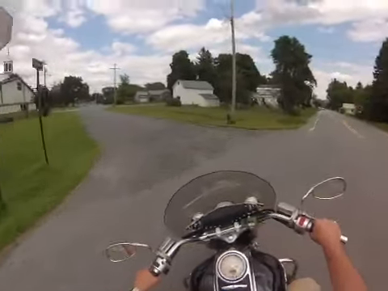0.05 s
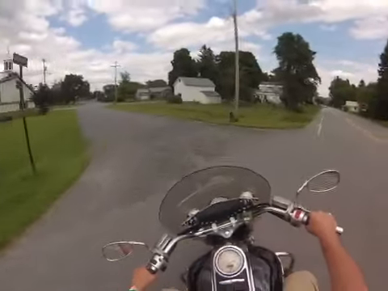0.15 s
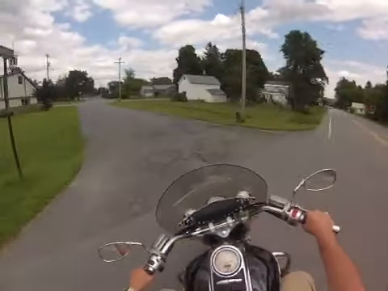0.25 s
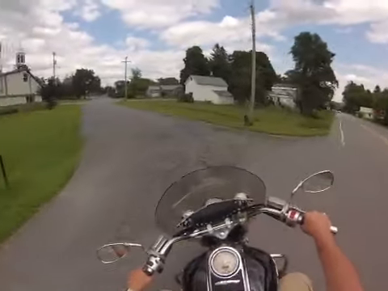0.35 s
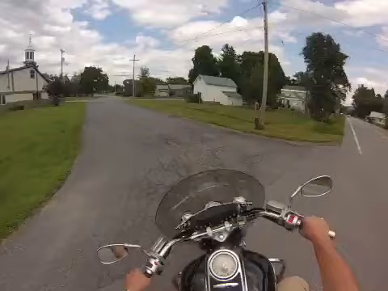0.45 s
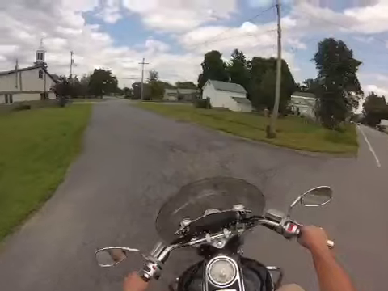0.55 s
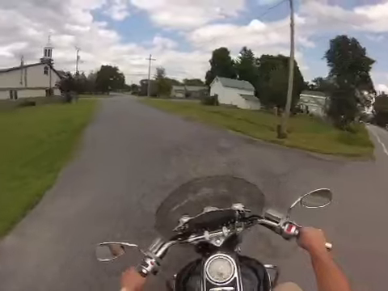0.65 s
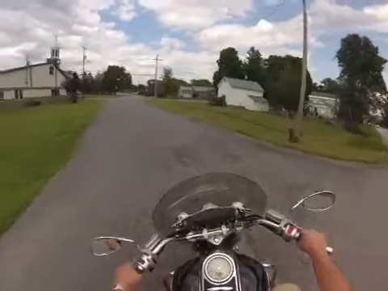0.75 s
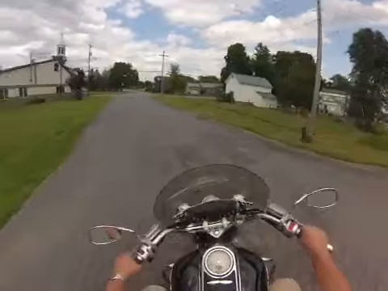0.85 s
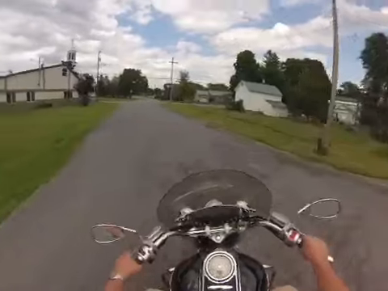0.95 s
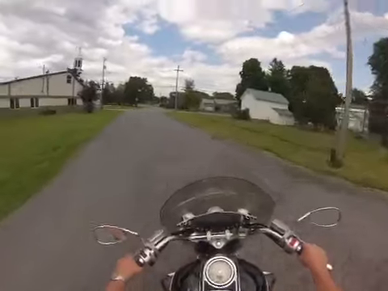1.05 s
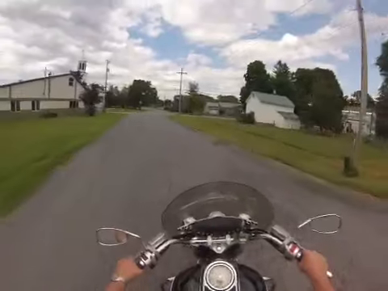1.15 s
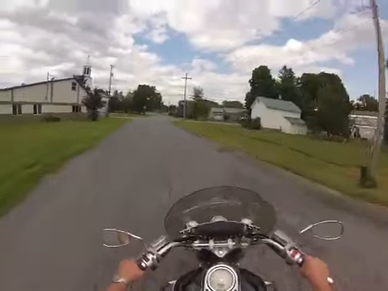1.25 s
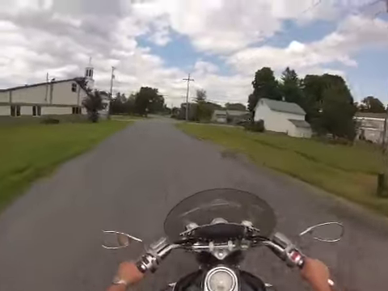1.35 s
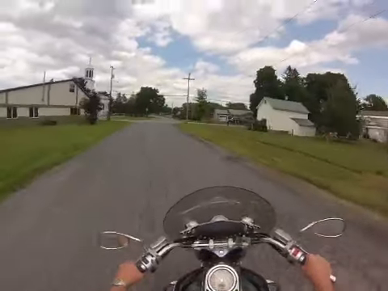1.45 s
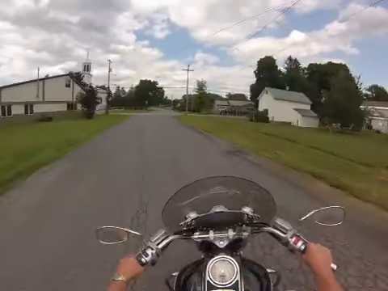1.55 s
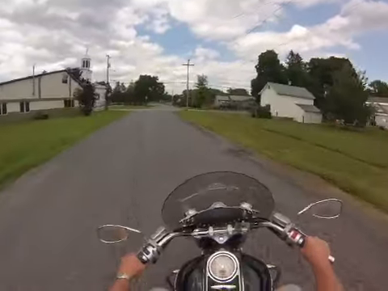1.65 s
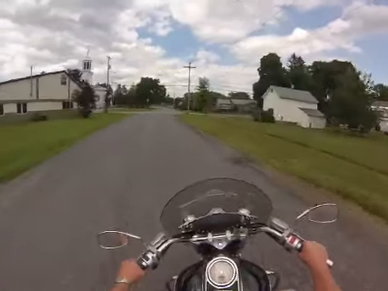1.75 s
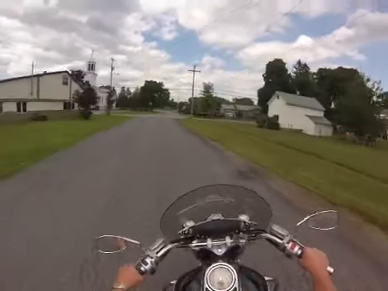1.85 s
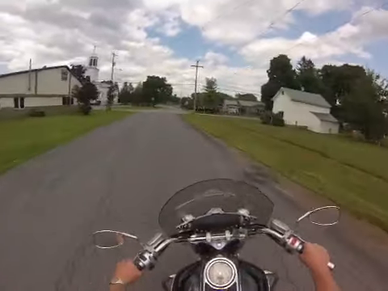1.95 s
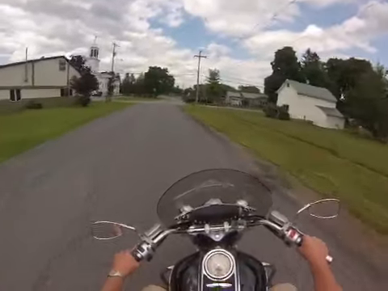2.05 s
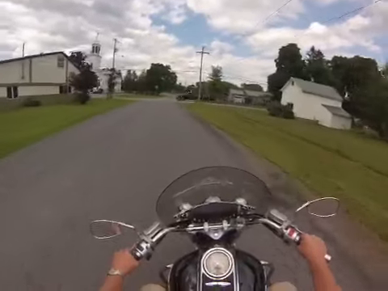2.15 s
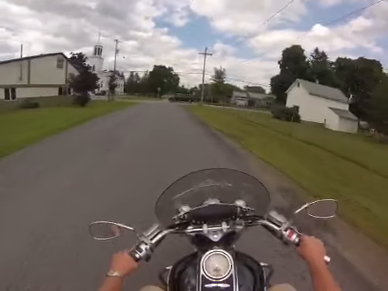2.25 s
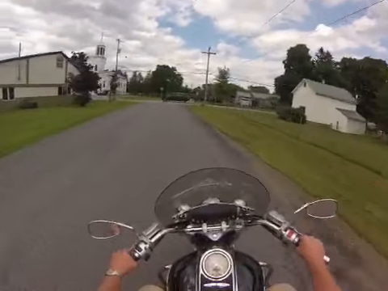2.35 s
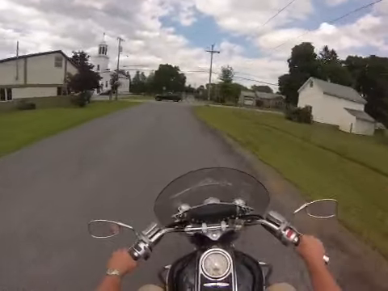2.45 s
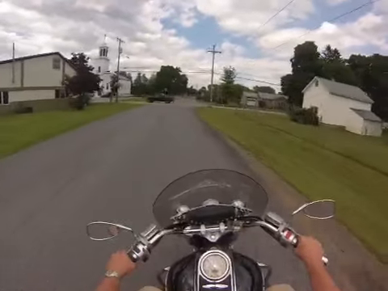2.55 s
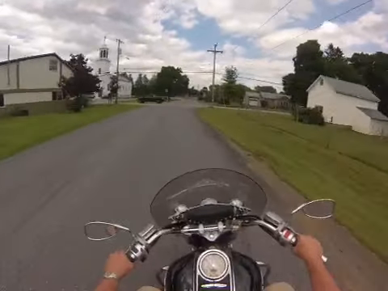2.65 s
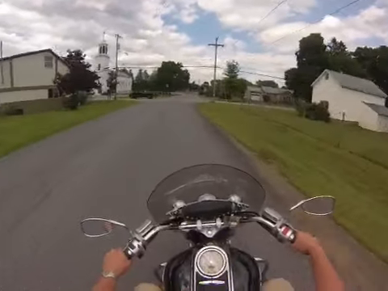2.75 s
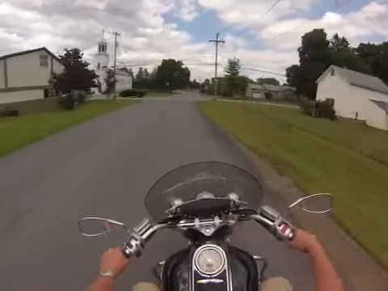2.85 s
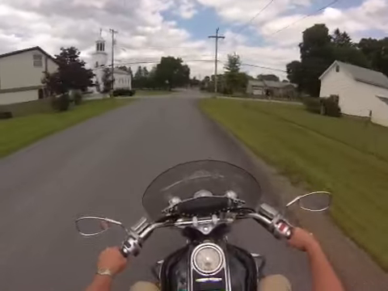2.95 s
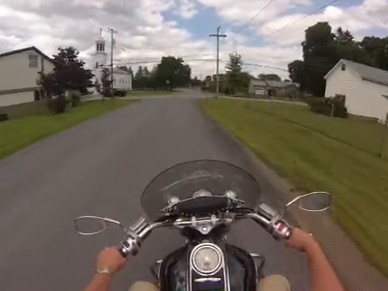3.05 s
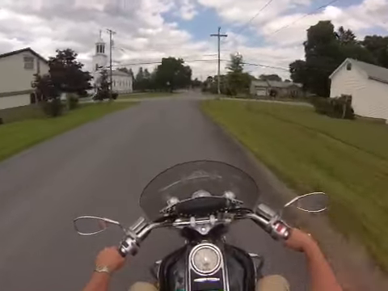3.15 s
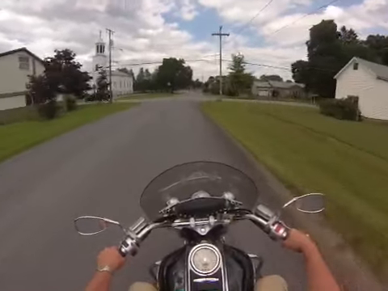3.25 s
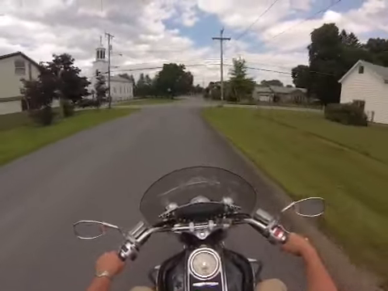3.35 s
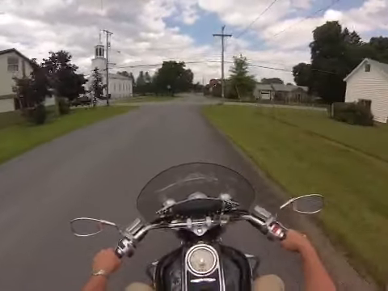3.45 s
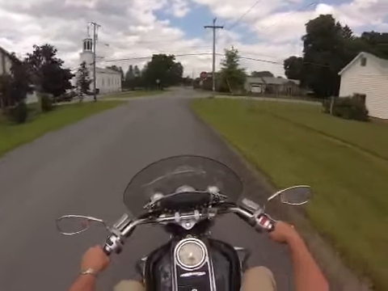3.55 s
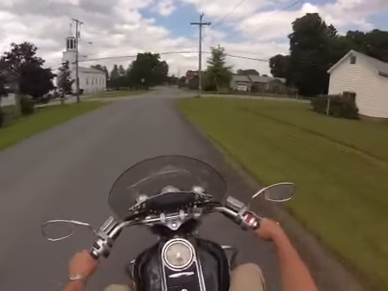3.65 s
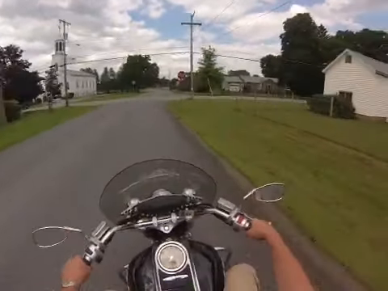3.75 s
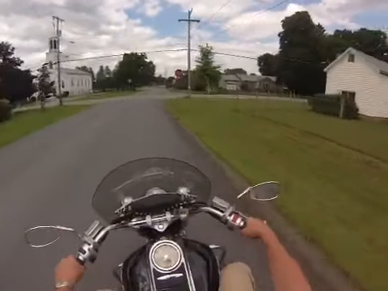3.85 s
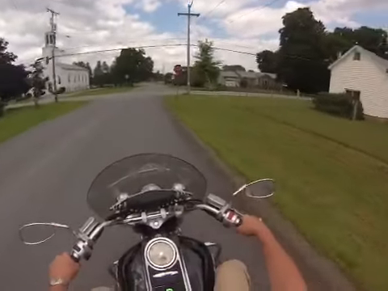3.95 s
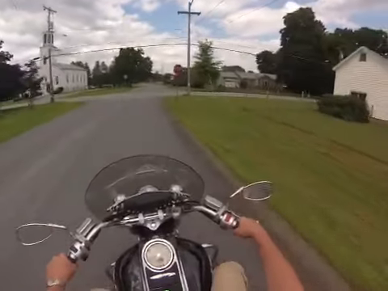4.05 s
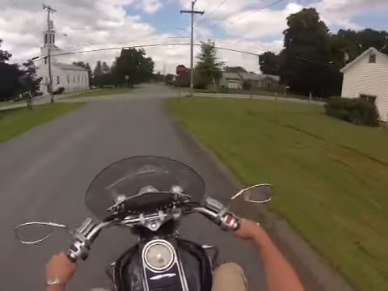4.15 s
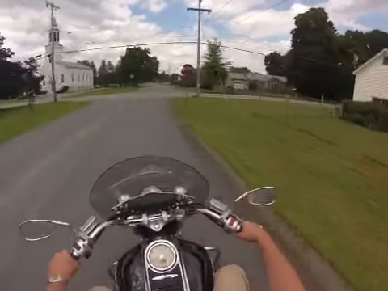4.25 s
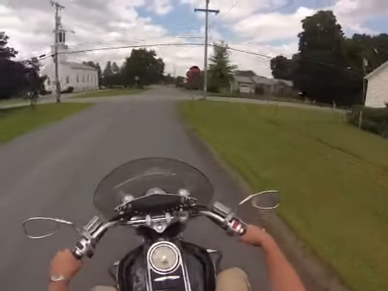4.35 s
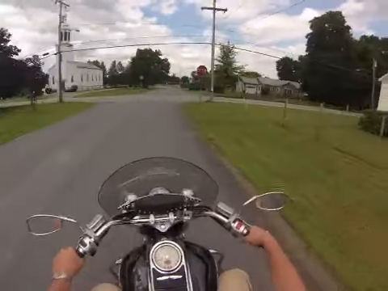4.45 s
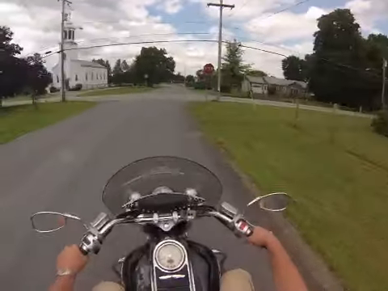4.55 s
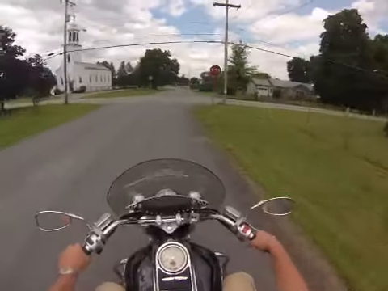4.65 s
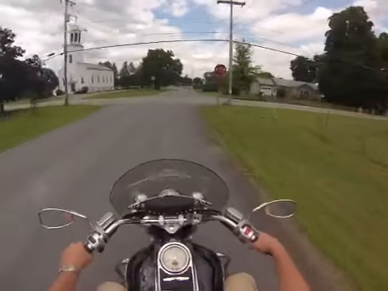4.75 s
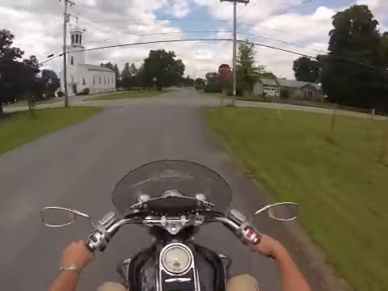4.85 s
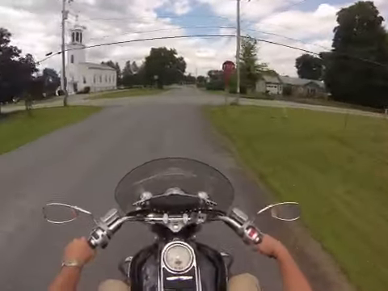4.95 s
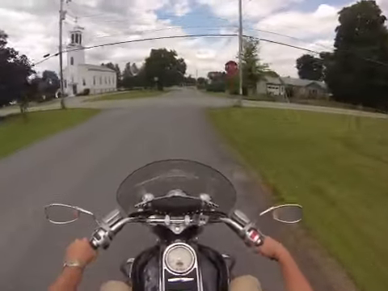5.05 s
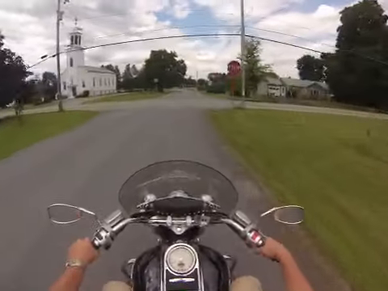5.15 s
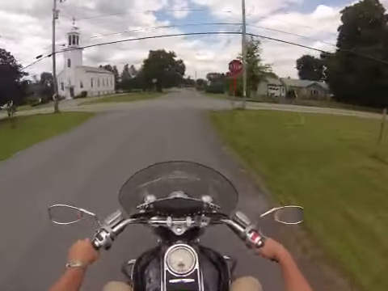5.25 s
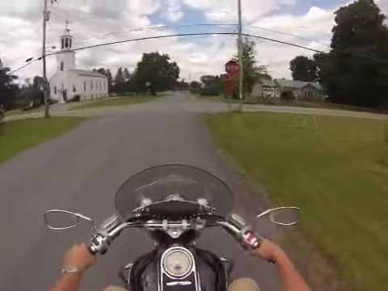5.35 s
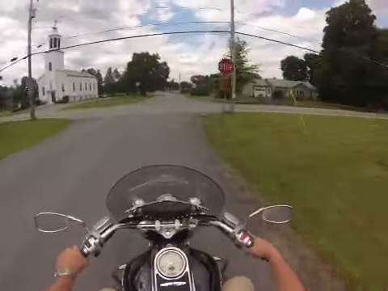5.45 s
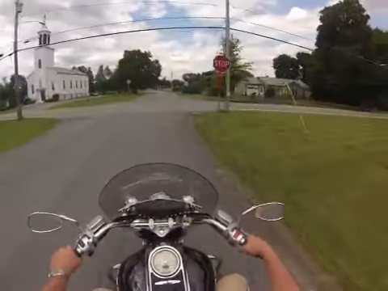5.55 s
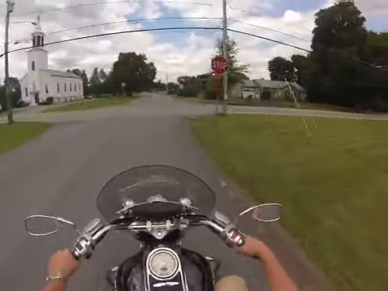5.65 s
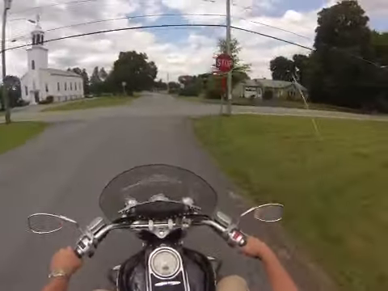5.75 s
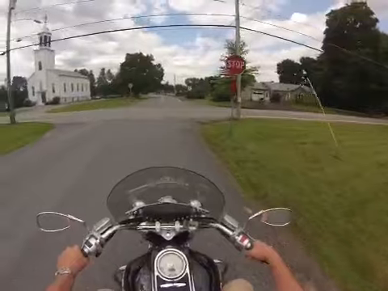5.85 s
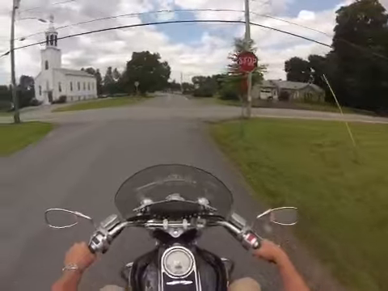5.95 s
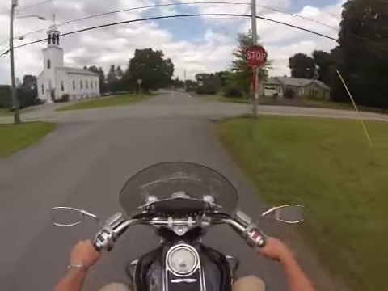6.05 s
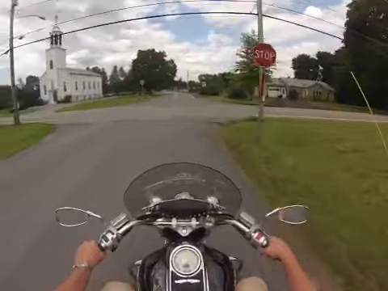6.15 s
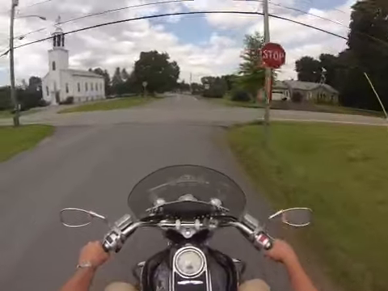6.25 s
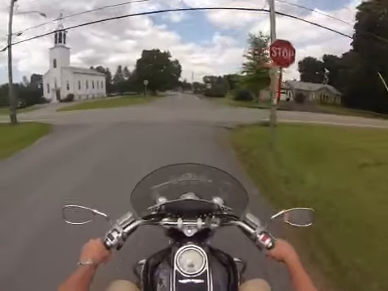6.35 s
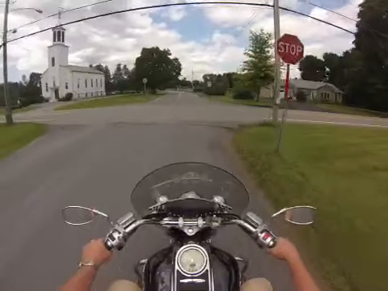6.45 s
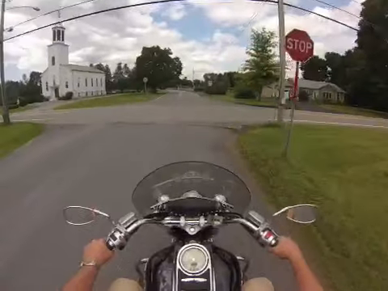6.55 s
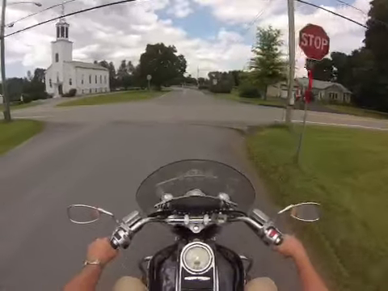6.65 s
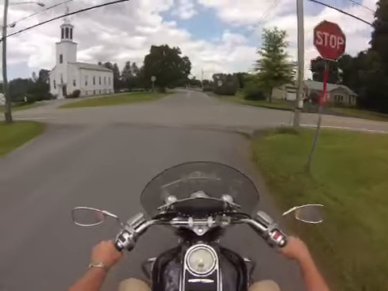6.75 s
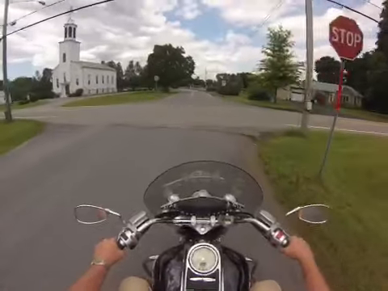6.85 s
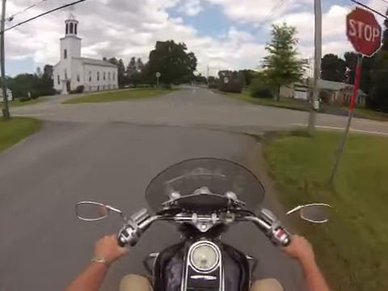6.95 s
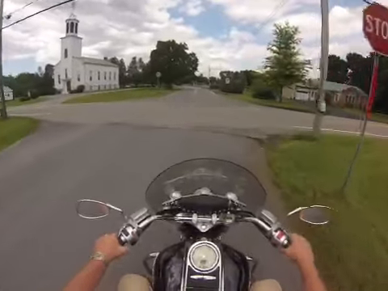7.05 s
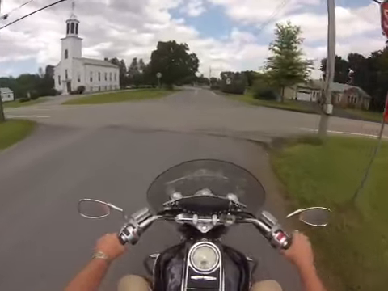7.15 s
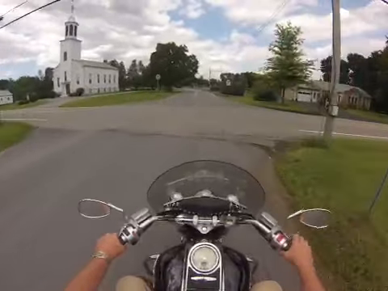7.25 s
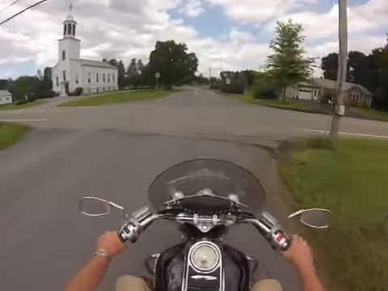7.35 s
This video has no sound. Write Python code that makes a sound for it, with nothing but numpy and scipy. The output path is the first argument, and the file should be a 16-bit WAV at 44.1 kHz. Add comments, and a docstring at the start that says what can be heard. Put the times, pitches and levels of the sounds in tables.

```python
"""Open road with trees at the side, heard from a V-twin cruiser through its rider's camera microphone.
The engine pulls harder up to 2.7 s, the throttle drops near 2.8 s and the beats slow towards idle.
Uneven pairs of exhaust beats drive two resonant pipes and a noisy bark; taps shake a ringing engine case.
Coloured noise makes the gear whirr, intake, rush, buffeting and hiss.
The linkage clacks in noise bursts and decaying sines; a far bird chirps in gliding sines with an echo."""
import sys
import numpy as np
from scipy import signal
from scipy.fft import rfft, irfft, next_fast_len
from scipy.io import wavfile
from scipy.ndimage import uniform_filter1d, map_coordinates

SR = 44100
rng = np.random.default_rng(int(sys.argv[2]) if len(sys.argv) > 2 else 0)


def pcm_store(signal):
    """Save signal as 16-bit PCM."""
    levels = np.round(np.clip(np.atleast_2d(signal), -1, 1) * 32767)
    wavfile.write(sys.argv[1], SR, levels.astype(np.int16).T)


N = 326781
TIME = np.arange(N) / SR


def amp(db):
    """Decibels to gain."""
    return 10 ** (np.asarray(db) / 20)


def unit(x):
    """Scale to rms 1."""
    return x / np.sqrt(np.mean(x ** 2) + 1e-20)


def curves(rows):
    """One value per sample for each column after the time."""
    times, *columns = np.transpose(rows)
    return [np.interp(TIME, times, column) for column in columns]


def wobble(rate):
    """A smooth random curve through normal knots, rate knots a second."""
    knots = rng.standard_normal(int(N * rate / SR) + 4)
    return map_coordinates(knots, [TIME * rate])


def colour(x, points):
    """Pass x through a causal, minimum-phase body with the given (frequency [Hz], gain [dB])."""
    m = 2 * next_fast_len(N // 2 + SR // 2)
    hz, db = np.transpose(points)
    bins = np.fft.rfftfreq(m, 1 / SR)
    gain = amp(np.interp(np.log(bins + 1), np.log(hz + 1), db))
    # folding the cepstrum forward in time makes the response causal
    cepstrum = irfft(np.log(gain))
    cepstrum[1:m // 2] *= 2
    cepstrum[m // 2 + 1:] = 0
    return irfft(rfft(x, m) * np.exp(rfft(cepstrum)))[:N]


def noise(points):
    """Coloured noise of rms 1."""
    return unit(colour(rng.standard_normal(N), points))


def patchy(x, depth_db):
    """Let the colour of a noise drift in patches of time and frequency."""
    z = signal.stft(x, nperseg=1024)[2]
    field = uniform_filter1d(rng.standard_normal(z.shape), size=5, axis=0)
    field = uniform_filter1d(field, size=14, axis=1)
    return signal.istft(z * amp(depth_db * unit(field)), nperseg=1024)[1][:N]


def impulses(times, sizes):
    """A train of sharp pushes, each one sample long."""
    return np.bincount(np.clip(times * SR, 0, N).astype(int), sizes, N + 1)[:N]


def dying(train, t60):
    """Give every push an exponential tail that falls 60 dB in t60 seconds."""
    return signal.lfilter([1], [1, -amp(-60 / (t60 * SR))], train)


# Engine speed: (time [s], four-stroke cycles per second [Hz])
ENGINE_SPEED = [(0, 9.178), (.35, 9.117), (.55, 9.147), (.8, 9.697), (1.1, 9.743), (1.7, 10.335),
                (2.3, 10.978), (2.62, 11.429), (3.05, 7.87), (3.5, 6.9), (4.35, 7.48), (4.7, 7.4),
                (5, 7.307), (5.4, 7.22), (5.8, 7.015), (6.2, 7.162), (6.6, 6.99), (7, 7.019), (7.41, 7.2)]


def engine_speed():
    """Four-stroke cycles per second; each cylinder fires once in a cycle."""
    return curves(ENGINE_SPEED)[0]


def passes(cycle, angle):
    """Times at which the engine passes a given share of its cycle."""
    return np.interp(np.arange(int(cycle[-1] - angle) + 1) + angle, cycle, TIME)


# The engine stumbles more around the throttle's drop: (time [s], scatter of firing strength [dB])
STUMBLE = [(0, .5), (2.4, .9), (3, 1.6), (4.5, 1.4), (4.8, .6), (7.41, .8)]
JITTER_HOT_S, JITTER_COOL_S = .0003, .0008  # scatter of the firing times
# after the throttle drops the cylinders starve and fire weakly
OVERRUN_S, OVERRUN_WIDTH_S, OVERRUN_DB = 3.2, .45, -3


def firings(cycle, angle, heat):
    """One cylinder's beats, steady while the gas is hot and looser as it cools."""
    times = passes(cycle, angle)
    strength, lateness = rng.standard_normal((2, len(times)))
    jitter = JITTER_COOL_S + (JITTER_HOT_S - JITTER_COOL_S) * np.interp(times, TIME, heat)
    starved_db = OVERRUN_DB * np.exp(-((times - OVERRUN_S) / OVERRUN_WIDTH_S) ** 4)
    scatter_db = np.interp(times, *np.transpose(STUMBLE))
    return impulses(times + jitter * lateness, amp(starved_db + strength * scatter_db))


# Pipes full of hot gas: (frequency [Hz], front pipe gain [dB], rear pipe gain [dB])
HOT_PIPES = [(12.1, -9.5, -11.5), (25.3, 3, 5), (34, 3.5, 1.5), (42, 3.5, -0.5), (47.8, 8, 7.5), (60, 8, 7),
             (69, 5.5, 7), (79.6, 7.5, 9), (93.6, 9, 12.5), (105, -18, -8), (116, -20, -26),
             (135, -26.5, -17.5), (162, -18, -19.5), (217, -21.5, -19.5), (300, -32.5, -35.5),
             (496, -63, -63), (1010, -91, -88)]
# The same pipes cooled: (frequency [Hz], front pipe gain [dB], rear pipe gain [dB])
COOL_PIPES = [(11.8, -6, -19), (25, -5, -20), (34.5, 7, 7.5), (42, 5, 7), (51, 11.5, 3), (59, 10, 0.5),
              (71, 2, 2.5), (84.8, 10.5, 7.5), (93.3, 1, 2.5), (101.5, -16, -4), (114, -14, -18),
              (135, -21, -22), (165, -26, -26), (220, -29, -28), (300, -29, -26), (503, -59, -62),
              (1000, -90, -91)]


def pipe(beats, heat, column):
    """One cylinder's pipe (column 1 front, 2 rear), whose resonances shift as the gas cools."""
    hot = [(row[0], row[column]) for row in HOT_PIPES]
    cool = [(row[0], row[column]) for row in COOL_PIPES]
    return colour(beats * heat, hot) + colour(beats * (1 - heat), cool)


# Load on the engine: (time [s], throttle opening [0-1])
THROTTLE = [(0, 0.83), (.8, 0.87), (2, 1), (2.76, 0.9), (2.85, 0.2), (2.95, 0.5)]
# Heat of the exhaust gas: (time [s], heat [0-1])
HEAT = [(0, 1), (1.5, 1), (2.7, 0.96), (4.4, 0.6), (5, 0.38), (6, 0.23), (7.41, 0)]
# Extra firings around the overrun: (time [s], strength in the rear pipe re a normal firing [dB])
POPS = [(2.625, 3.5), (2.666, -2), (2.701, 8.5), (2.771, 6.5), (2.808, -1), (3.13, 1.5), (3.301, -3),
        (3.631, 4), (3.737, 8), (3.817, 4.5), (4.009, -2.5), (4.104, 6.5), (4.502, 1)]
# Colour of the exhaust's bark: (frequency [Hz], gain [dB])
BARK = [(70, -56.5), (125, 10), (160, -3), (205, 6), (245, 0), (290, -11), (360, -19), (520, -27.5),
        (900, -17), (2500, -62.5)]
# levels with no load and cold gas, then the rise at full throttle and at full heat
THUMP_DB, THUMP_LOAD_DB, THUMP_HEAT_DB = -43, 8.5, 1
BARK_DB, BARK_LOAD_DB, BARK_HEAT_DB = -74.5, 18.5, 6.5
REFLECTION_S = 0.01205  # round trip of a pressure wave in the exhaust


def exhaust(cycle):
    """Front then rear cylinder fires, then both rest; each thumps its own pipe, and both bark under load."""
    throttle, heat = np.clip(curves(THROTTLE) + curves(HEAT), 0, 1)
    thump_db = THUMP_DB + THUMP_LOAD_DB * throttle + THUMP_HEAT_DB * heat
    bark_db = BARK_DB + BARK_LOAD_DB * throttle + BARK_HEAT_DB * heat
    # shares of the cycle: the rear follows by a little over a third
    front, rear = firings(cycle, .117, heat), firings(cycle, .474, heat)
    regular = front + rear
    pop_s, pop_db = np.transpose(POPS)
    pops = impulses(pop_s, amp(pop_db))

    # hot, turbulent gas keeps the front pipe murmuring between the beats
    murmur = amp(-28) * regular.std() * heat * rng.standard_normal(N)
    front_thump = pipe(front + murmur, heat, column=1)
    rear_thump = pipe(rear + pops, heat, column=2)
    thump = unit(front_thump + rear_thump)

    # the bark is the blowdown of each stroke and its reflection from the end of the pipe
    reflection = np.interp(TIME - REFLECTION_S, TIME, regular)
    blowdown = unit(regular + 0.56 * pops + 0.45 * reflection)
    puff = unit(dying(blowdown, t60=.09) * rng.standard_normal(N))
    bark = unit(colour(blowdown + .4 * puff, BARK))
    return amp(thump_db) * thump + amp(bark_db) * bark


# Ring of the engine case: (frequency [Hz], gain [dB])
CASE = [(700, -39.5), (1020, -12.5), (1190, -6.5), (1270, 1.5), (1335, 3.5), (1385, -1), (1440, -4),
        (1550, -10.5), (1750, -12.5), (2080, -11), (2450, -29.5), (4000, -58)]
# Level of that ring: (time [s], level [dB])
CASE_LEVEL = [(0, -49.5), (.9, -48), (2.8, -53), (3.5, -57.5), (5.4, -57), (5.95, -58.5), (6.2, -54.5),
              (6.41, -52), (6.75, -56), (7.41, -56)]
# Harder knocks of the valve train: (time [s], strength re a normal tap [dB])
KNOCKS = [(0.449, 9), (0.512, 2), (0.731, 7), (3.731, 8), (4.027, 11), (5.383, 14), (5.428, 12)]
# Spectrum of the gear whirr: (frequency [Hz], relative density [dB per Hz])
GEARS = [(700, -37.5), (1100, 0.5), (1600, -1.5), (1800, -2), (1980, -1), (2200, 4), (2420, 1.5),
         (2620, -6.5), (2850, -6), (3200, -12), (3700, -11), (4150, -20), (4550, -16), (5100, -23),
         (7000, -19), (15000, -71)]
# Level of the whirr: (time [s], level [dB])
GEAR_LEVEL = [(0, -59.5), (.9, -58.5), (1.7, -60.5), (2.7, -56), (3.3, -60.5), (4.5, -62), (5.95, -62),
              (6.38, -60), (6.8, -63.5), (7.41, -62.5)]
CASE_THROB_DB, CASE_THROB_ANGLE = .9, .6  # once-a-cycle swell: depth, share of the cycle at its peak
TAP_SCATTER_DB = 2.6
CASE_FLUTTER = .008  # relative scatter of the ring's pitch


def machinery(cycle):
    """Valve taps rattle the engine case, whose ring flutters near 1.3 kHz; gear teeth whirr above it."""
    case_db, = curves(CASE_LEVEL)
    gear_db, = curves(GEAR_LEVEL)
    times = np.concatenate([passes(cycle, angle) for angle in (.21, .4, .6, .72, .89)])
    taps = impulses(times, amp(TAP_SCATTER_DB * rng.standard_normal(len(times))))
    clatter = unit(dying(taps, t60=0.084))
    knock_s, knock_db = np.transpose(KNOCKS)
    knocks = impulses(knock_s, amp(knock_db))

    throb = amp(CASE_THROB_DB * np.cos(2 * np.pi * (cycle - CASE_THROB_ANGLE)))
    rattle = unit(throb * (1 + .19 * clatter) * rng.standard_normal(N))
    shaken = colour(rattle + .33 * unit(taps + knocks), CASE)
    # a wandering delay [samples] bends the pitch
    drift = np.cumsum(CASE_FLUTTER * wobble(25))
    ring = unit(map_coordinates(shaken, [np.arange(N) + drift], mode="mirror"))
    whirr = unit((1 + 0.12 * clatter) * patchy(noise(GEARS), depth_db=2.34))
    return amp(case_db) * ring + amp(gear_db) * whirr


# Hoarse draw of the air intake: (frequency [Hz], relative density [dB per Hz])
INTAKE = [(600, -28.5), (800, -1), (950, -8), (1050, 6), (1150, -10), (1600, -14), (2400, -5.5),
          (2800, -13.5), (3200, -26), (4600, -24.5), (7000, -45)]
INTAKE_DB, INTAKE_DB_PER_OCTAVE = -54, 30.5  # level at peak revs, rise per doubling of revs


def intake():
    """Turbulent air drawn into the engine, a hoarse noise that grows as the revs climb."""
    speed = engine_speed()
    octaves = np.log2(speed / speed.max())
    return amp(INTAKE_DB + INTAKE_DB_PER_OCTAVE * octaves) * noise(INTAKE)


# Gear lever and linkage: (time [s], strike [dB], decay t60 [s], snap re strike [dB],
# ring re strike [dB], ping of the lever re strike [dB]); body and snap get further gains below
CLACKS = [(0.683, -54.5, 0.049, -7.5, 5, -10), (0.726, -50, 0.1, -18, 6, -8),
          (0.865, -50.5, 0.24, -15, -8, -10), (0.9, -48, 0.032, -22, 13, -6),
          (0.917, -52, 0.053, -24, -1, -10), (0.954, -58.5, 0.064, -0.5, -2, -10),
          (1.016, -61.5, 0.033, -3, 3, -10), (2.96, -54, 0.11, -20, 3, -6), (5.282, -53, 0.04, -18, 2, 11),
          (5.361, -47, 0.048, -19.5, -2, 7), (5.369, -49, 0.044, -27, -1, -5),
          (5.374, -57, 0.03, -27, 0, 3), (5.474, -58, 0.043, -20, 8, 10.5),
          (5.485, -52.5, 0.11, -27, 1, -4), (6.38, -68, 0.24, -14, 0, -6)]
# Ring of the linkage: (frequency [Hz], level [dB], t60 [s])
LINK_MODES = [(865, -11, 0.063), (1120, -11, 0.044), (1322, -1, 0.1)]
# Ping of the lever: (frequency [Hz], level [dB], t60 [s])
PING_MODES = [(2400, -5.5, 0.043), (2450, -10, 0.047), (2910, -13, 0.036)]
# Spectrum of a clack's body: (frequency [Hz], relative density [dB per Hz])
CLACK = [(60, -50), (150, -24), (380, 3), (700, -2), (1250, 4), (1700, -2), (2500, -2.5), (2950, -12.5),
         (3400, -11.5), (6500, -38), (12000, -36)]
# Spectrum of its bright snap: (frequency [Hz], relative density [dB per Hz])
SNAP = [(1500, 11), (4000, 10), (6500, 10.5), (8000, 4), (11000, -17), (15000, -37)]
CLACK_ATTACK_S = .0012
MODE_SCATTER_DB = 2


def linkage():
    """Short metal blows scrape as noise with a snap, and set linkage and lever ringing as dying sines."""
    body, snap, ring = np.zeros((3, N))
    t = TIME[:SR // 4]
    for s, db, t60, snap_db, ring_db, ping_db in CLACKS:
        age = np.maximum(TIME - s, 0)
        blow = amp(db - 60 * age / t60) * (1 - np.exp(-age / CLACK_ATTACK_S))
        body += blow
        snap += blow * amp(snap_db)
        here = ring[int(s * SR):][:len(t)]
        for modes, strike_db in ((LINK_MODES, ring_db), (PING_MODES, ping_db)):
            for hz, level, mode_t60 in modes:
                mode_db = db + strike_db + level + rng.normal(0, MODE_SCATTER_DB)
                here += amp(mode_db - 60 * t / mode_t60) * np.sin(2 * np.pi * hz * t)
    return ring + amp(6.0) * body * noise(CLACK) + amp(8.5) * snap * noise(SNAP)


# Strength of the rush and buffeting, falling quickly as the throttle drops: (time [s], strength)
STRENGTH = [(0, 7.7), (2.7, 10.7), (2.92, 8.9), (3.5, 7.13), (7.41, 4.78)]
# Gusts on the microphone: (time [s], half width [s], swell [dB])
GUSTS = [(.97, 0.52, 10.5), (1.6, 0.1, 7), (2.6, 0.2, 4.5), (3.42, 0.2, 8.5), (5.4, 1, 4),
         (6.85, 0.24, 3.5)]
# Spectrum of the buffeting: (frequency [Hz], relative density [dB per Hz])
BUFFET = [(2, -29.5), (6, -7), (10, -2.5), (15, -9.5), (22, -15), (35, -22), (60, -29), (120, -35),
          (300, -56), (1000, -88)]
# Spectrum of the rush: (frequency [Hz], relative density [dB per Hz])
RUSH = [(80, 9), (160, 7.5), (280, 4.5), (350, 8), (420, 5), (520, 3), (680, -2), (840, 2), (1000, -4),
        (1600, -3.5), (3000, -16), (8000, -43), (15000, -71)]
# levels at the reference strength, rise per doubling of strength
REFERENCE_STRENGTH = 10
BUFFET_DB, BUFFET_DB_PER_OCTAVE = -36, 6.5
RUSH_DB, RUSH_DB_PER_OCTAVE = -50.5, 9.5


def rush_and_buffeting():
    """A broad rush and a deep buffeting of the microphone follow one strength; gusts swell the buffeting."""
    octaves = np.log2(curves(STRENGTH)[0] / REFERENCE_STRENGTH)
    gust_db = sum(db * np.exp(-((TIME - s) / width) ** 2) for s, width, db in GUSTS)
    buffet_db = BUFFET_DB + BUFFET_DB_PER_OCTAVE * octaves + gust_db
    buffet = amp(buffet_db) * unit(amp(1.0 * wobble(12)) * noise(BUFFET))
    rush_db = RUSH_DB + RUSH_DB_PER_OCTAVE * octaves + 0.91 * wobble(12)
    return buffet + amp(rush_db) * noise(RUSH)


# Far bird: (time [s], length [s], start [Hz], end [Hz], arch of the pitch [Hz], level [dB])
CHIRPS = [(3.214, .053, 3400, 3300, 30, -63), (3.728, .06, 2760, 3300, 110, -61),
          (4.44, .14, 2620, 2740, 85, -61), (5.028, .04, 3360, 3300, 50, -60.5),
          (5.058, .03, 3280, 3020, 0, -68), (5.14, .05, 2700, 2720, 20, -63),
          (5.74, .07, 2930, 3080, 50, -66)]
TREES_T60_S, TREES_DB = .2, -13  # echo of the trees: decay, level
BIRD_WAVER = .014  # relative scatter of the pitch


def bird():
    """Faint whistles, sines gliding along an arch, blurred by the echo of the roadside trees."""
    song = np.zeros(N)
    for s, length, start_hz, end_hz, arch_hz, db in CHIRPS:
        progress = np.clip((TIME - s) / length, 0, 1)
        arch = np.sin(np.pi * progress)
        hz = start_hz + (end_hz - start_hz) * progress + arch_hz * arch
        hz = hz * (1 + BIRD_WAVER * wobble(300))
        song += amp(db) * arch * np.sin(2 * np.pi * np.cumsum(hz) / SR)
    tail = amp(-60 * TIME[:SR // 4] / TREES_T60_S) * rng.standard_normal(SR // 4)
    echo = signal.fftconvolve(song, tail / np.linalg.norm(tail))[:N]
    return song + amp(TREES_DB) * echo


# Spectrum of the treble flicker: (frequency [Hz], relative density [dB per Hz])
FLICKER = [(4000, -25), (9000, -11), (12000, -9), (15000, -6)]
# first time, period, half width, level
FLICKER_S, FLICKER_EVERY_S, FLICKER_WIDTH_S, FLICKER_DB = 0.094, 1, 0.027, -70


def treble_flicker():
    """Treble noise flickers faintly over the hiss once a second."""
    times = np.arange(FLICKER_S, TIME[-1], FLICKER_EVERY_S)
    swell = sum(np.exp(-((TIME - s) / FLICKER_WIDTH_S) ** 2) for s in times)
    return amp(FLICKER_DB) * swell * noise(FLICKER)


def scene():
    """One crankshaft drives exhaust and clatter; intake, linkage, rush, buffeting and bird join in."""
    cycle = np.cumsum(engine_speed()) / SR
    engine = exhaust(cycle) + machinery(cycle) + intake()
    return (engine + linkage() + rush_and_buffeting() + bird())[None]


# Spectrum of the steady hiss: (frequency [Hz], relative density [dB per Hz])
HISS = [(100, 10.5), (3000, 3.5), (6500, 0.5), (9000, -2), (11000, -1), (13000, -5.5), (15000, -8.5)]
TOP_HZ = 15250  # band limit


def record(dry):
    """Adds a steady hiss and a faint treble flicker once a second, and keeps nothing above the band limit."""
    sound = dry + amp(-67.5) * noise(HISS) + treble_flicker()
    m = next_fast_len(N + SR // 2)
    kept = np.fft.rfftfreq(m, 1 / SR) < TOP_HZ
    return irfft(rfft(sound, m) * kept, m)[:, :N]


dry = scene()
out = record(dry)
pcm_store(out)
```